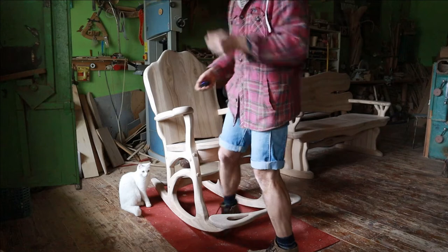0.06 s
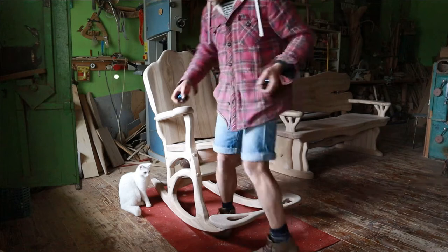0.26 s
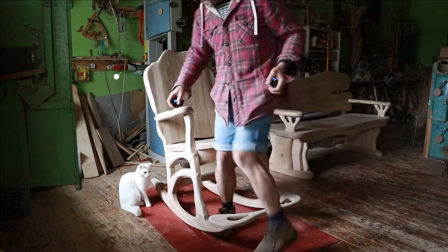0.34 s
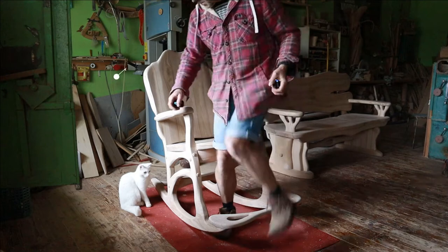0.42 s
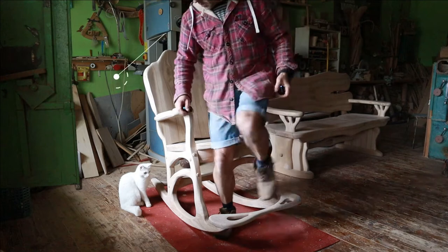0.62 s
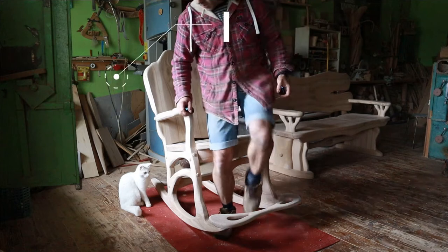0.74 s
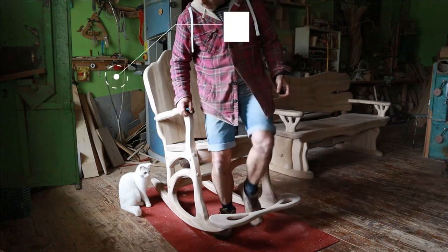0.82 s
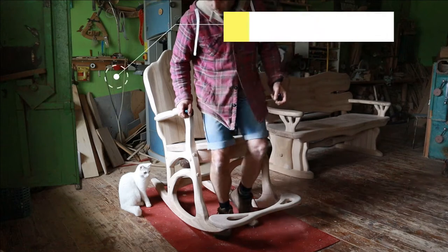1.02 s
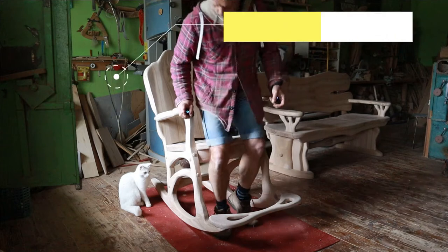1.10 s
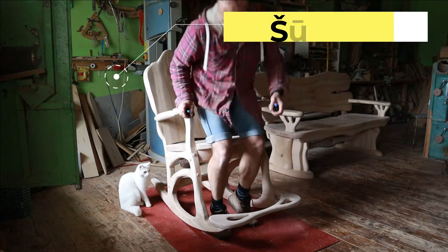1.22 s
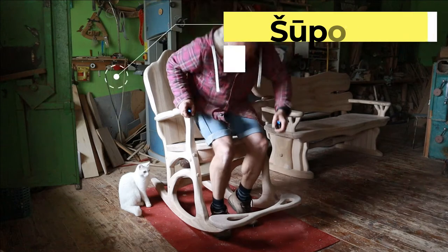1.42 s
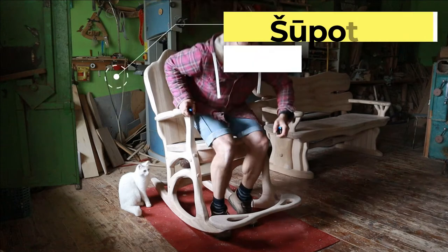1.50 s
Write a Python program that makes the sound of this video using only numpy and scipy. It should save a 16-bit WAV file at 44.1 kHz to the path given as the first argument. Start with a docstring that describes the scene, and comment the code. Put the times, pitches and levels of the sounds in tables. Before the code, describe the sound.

Dull steps on a wooden floor, with scuffing soles and a rocking chair's dry ticks.

```python
"""Someone steps about on a rug over floorboards in a workshop and lowers onto a wooden rocking chair.
First, heels set the boards ringing in a quick run of thumps, while soles scuff and wood ticks.
Near the middle come a few sharp ticks and more rubbing of soles and clothes. After one second,
softer thumps and lower ticks follow, and a last scuff trails off.
All the way through, the room hisses softly with one faint whine."""
import sys
import numpy as np
from scipy import signal
from scipy.fft import rfft, irfft
from scipy.io import wavfile
from scipy.ndimage import uniform_filter1d

SR = 44100
rng = np.random.default_rng(int(sys.argv[2]) if len(sys.argv) > 2 else 0)


def store_pcm(level_fs):
    """Save levels as 16-bit WAV."""
    pcm = np.round(np.clip(level_fs, -1, 1) * 32767).astype(np.int16)
    wavfile.write(sys.argv[1], SR, np.atleast_2d(pcm).T)


N = 68355


def floor_thumps():
    """A heel or chair runner rings the board notes near its pitch, until weight chokes the ring."""
    # Blows on the boards: (time [s], level [dB], pitch struck most [Hz], time until choked [s])
    blows = [(.151, -46, 72, .03), (0.2204, -25.5, 225.4, 0.016), (0.2256, -26, 70, 0.033),
             (.26, -24.5, 114, 0.011), (0.282, -24.5, 167, 0.0081), (0.288, -21.5, 77, 0.025),
             (0.2925, -29, 241, 0.0388), (.2944, -28.5, 164, 0.013), (0.3154, -29.5, 138, 0.0067),
             (0.3227, -21.5, 137, 0.00755), (.338, -35.5, 196, 0.0247), (0.3486, -26, 106, 0.0167),
             (0.3746, -24.5, 129.4, .016), (0.4015, -29, 47.6, 0.035), (0.4052, -29.5, 124.3, 0.0105),
             (.432, -38, 129, 0.035), (0.4869, -33.5, 114.6, .011), (.487, -39, 56, .035),
             (.526, -40, 55, .065), (.67, -44.5, 56, .037), (.916, -50, 66, .036), (1.062, -45, 105, .015),
             (1.09, -38, 76, .032), (1.128, -44, 95, .016), (1.262, -42, 68, 0.033),
             (1.306, -43, 78, 0.036)]
    # The boards' own notes: (pitch [Hz], level [dB], time to fade by 60 dB [s])
    board_notes = [(55.0, -1.2, 0.274), (72.0, 0.7, 0.275), (96.0, -2.5, 0.6), (150.0, 2.1, 0.367),
                   (188.0, -2.5, 0.6), (235.0, -4.9, 0.6), (278.0, 0.0, 0.118), (376.0, 9.8, 0.379)]
    choke_s, build_share = .003, .25
    out, t = np.zeros(N), np.arange(SR // 3) / SR
    for start, level_db, struck_hz, held_s in blows:
        ring = sum(bell_curve(hz, struck_hz, octaves=.27) * amp(db - 60 * t / fade_s)
                   * np.sin(2 * np.pi * hz * t) for hz, db, fade_s in board_notes)
        build = 1 - np.exp(-t / (build_share * held_s))
        choke = np.exp(-np.maximum(t - held_s, 0) / choke_s)
        add(out, start, amp(level_db) * ring * build * choke)
    return out


def scuffs():
    """Dragging soles and cloth make many tiny clicks that blur into a rub. Gives mid and side."""
    # Drags: (start [s], length [s], level [dB], centre pitch [Hz], width [octaves])
    drags = [(0.218, 0.027, -58.5, 3950, 0.27), (.222, 0.07, -52.5, 340, 0.31),
             (0.211, 0.1, -55.5, 900, 0.82), (0.273, 0.27, -52, 420, 1.16),
             (0.279, 0.16, -54.5, 1120, 1.48), (0.34, 0.3, -58.5, 1340, 1.18),
             (0.382, 0.084, -60, 5240, 0.88), (0.469, 0.59, -66.5, 7000, 0.82),
             (0.642, 0.29, -62.5, 4630, 0.38), (0.747, 0.12, -55.5, 1540, 1.06),
             (0.772, 0.41, -55.5, 2170, 0.72), (0.866, .07, -65, 2650, 0.15),
             (0.911, 0.069, -59, 1710, 0.12), (0.649, 0.17, -58, 1880, 0.97),
             (0.796, 0.3, -64.5, 6560, 0.62), (1.03, 0.58, -57.5, 130, .6), (1.06, 0.15, -54.5, 546, 1.84),
             (1.08, 0.34, -68.5, 8450, 0.4), (1.169, 0.22, -51, 695, 0.85), (1.19, 0.16, -56.5, 190, 0.67),
             (1.157, 0.25, -56.5, 2270, 0.95), (1.418, 0.47, -60.5, 2480, 0.76)]
    grit_per_s, grit_spread_db = 5500, 2
    skew = np.log(.5) / np.log(.3)  # a stroke is loudest 30% of the way through
    out, t = np.zeros((2, N)), np.arange(SR // 2) / SR
    for start, length, level_db, hz, octaves in drags:
        size, chance, sign = rng.random((3, len(t)))
        strength = amp(-grit_spread_db * np.log(size + .00085))
        grit = strength * (chance < grit_per_s / SR) * np.sign(sign - .5)
        rub = evened(keep_band(grit, hz, octaves))
        stroke = np.sin(np.pi * np.clip(t / length, 0, 1) ** skew) ** 2
        # The same rub, backwards and with less bass, makes the sound wide.
        side = amp(1) * signal.lfilter(*signal.butter(1, 900, "high", fs=SR), rub[::-1])
        add(out, start, amp(level_db) * stroke * np.array([rub, side]))
    return out


def wood_ticks():
    """Wood gives dry snaps: each is one sharp click and a crackle that dies away."""
    # Snaps: (time [s], peak level [dB], centre pitch [Hz], width [octaves], time to fade by 60 dB [s])
    snaps = [(0.2276, -48, 4200, 0.29, 0.012), (0.2935, -36.5, 2100, 0.4, 0.014),
             (0.338, -42, 1100, 0.4, 0.017), (.381, -37, 1300, 0.94, 0.033), (.4146, -28.5, 1900, .8, .014),
             (.7512, -31.5, 2300, .55, .012), (.7532, -37, 2800, .5, .012),
             (0.7825, -37, 1150, 0.55, 0.011), (0.798, -42, 1150, 0.24, 0.0074),
             (1.226, -47, 517, 0.39, 0.027), (1.2, -47.5, 600, 0.17, 0.028), (1.258, -42, 500, 0.2, 0.035),
             (1.304, -48, 600, 0.23, 0.041)]
    lead = 100  # samples of space ahead of the click, as the filter smears it both ways
    out, t = np.zeros(N), np.arange(2048) / SR
    click = 1. * (t == 0)
    for start, peak_db, hz, octaves, fade_s in snaps:
        crackle = .1 * rng.standard_normal(len(t))
        burst = (click + crackle) * amp(-60 * t / fade_s)
        snap = keep_band(np.roll(burst, lead), hz, octaves)
        add(out, start - lead / SR, amp(peak_db) * snap / abs(snap).max())
    return out


def room_echo(sound):
    """The room sends back many dull echoes that die away. Gives mid and a side with no bass."""
    fade_s, dull_hz, gap = .35, 5000, 20  # one echo falls at random in every gap of 20 samples
    slots = np.arange(300, SR // 2, gap)
    echoes = np.zeros((2, SR // 2 + gap))
    arrivals = slots + rng.integers(0, gap, (2, len(slots)))
    np.put_along_axis(echoes, arrivals, rng.choice([-1., 1.], arrivals.shape), 1)
    echoes *= amp(-60 * np.arange(echoes.shape[1]) / SR / fade_s)
    echoes = signal.lfilter(*signal.butter(1, dull_hz, fs=SR), echoes)
    mid, side = signal.fftconvolve(sound[None], echoes / np.linalg.norm(echoes[0]), axes=1)[:, :N]
    side = signal.lfilter(*signal.butter(2, 300, "high", fs=SR), side)
    return amp(-7) * np.array([mid, amp(-4) * side])


def room_hiss():
    """The room's soft hiss, in two separate layers. Gives mid and side."""
    # Hiss that is alike left and right: (pitch [Hz], relative level [dB])
    mid_tone = [(15, -87), (25, 11.5), (255, 4), (805, 0), (921, -2), (1110, -3.5), (1840, -5.5),
                (3690, -11), (11600, -24), (14800, -43)]
    # Hiss that is opposite left and right: (pitch [Hz], relative level [dB])
    side_tone = [(15, -51), (25, -40), (43, -44), (128, -8), (316, -8), (361, -13), (402, -7.5),
                 (3600, -20.5), (11000, -33), (14800, -45)]
    side = flickering_noise(side_tone, level_db=-51)
    return flickering_noise(mid_tone, level_db=-53), side


def flickering_noise(tone, level_db):
    """Steady noise in which patches of pitch drift in level and the whole sound flickers a little."""
    patch_db, flicker_db, frames = 1.2, .5, N // 128 + 5
    real, imaginary, patches = rng.standard_normal((frames, 257, 3)).T
    patches = uniform_filter1d(patches, size=6, axis=0)  # smooth across pitch
    patches = evened(uniform_filter1d(patches, size=20, axis=1))  # then across time
    flicker = evened(uniform_filter1d(rng.standard_normal(frames), size=8))
    spectrum = (real + 1j * imaginary) * amp(patch_db * patches + flicker_db * flicker)
    noise = signal.istft(spectrum, nperseg=512, noverlap=384)[1][:N]
    hz, db = np.transpose(tone)
    colour = amp(np.interp(np.log(np.fft.rfftfreq(N, 1 / SR) + 1), np.log(hz), db))
    return amp(level_db) * evened(irfft(rfft(noise) * colour, N))


def faint_whine(hz=3652, level_db=-71.5):
    """One thin, high tone that never changes."""
    return amp(level_db) * np.sqrt(2) * np.sin(2 * np.pi * hz * np.arange(N) / SR)


def amp(db):
    """Turns decibels into a number to multiply a sound by."""
    return 10 ** (np.asarray(db) / 20)


def evened(x):
    """Scales a signal so that its average strength (rms) is 1."""
    return x / np.sqrt(np.mean(x ** 2) + 1e-20)


def add(mix, start, sound):
    """Mixes a sound in at a start time in seconds."""
    part = mix[..., round(start * SR):][..., :sound.shape[-1]]
    part += sound[..., :part.shape[-1]]


def bell_curve(hz, centre_hz, octaves):
    """A weight that is 1 at the centre pitch and falls away above and below it."""
    return np.exp(-.5 * (np.log2(hz / centre_hz) / octaves) ** 2)


def keep_band(sound, centre_hz, octaves):
    """Keeps the part of a sound that lies near one pitch."""
    hz = np.fft.rfftfreq(len(sound), 1 / SR) + 1
    return irfft(rfft(sound) * bell_curve(hz, centre_hz, octaves), len(sound))


def scene():
    """Mixes mid (alike in both ears) and side (opposite in each ear) into left and right."""
    thumps, ticks, whine = floor_thumps(), wood_ticks(), faint_whine()
    rubs = scuffs()
    mid, side = rubs + room_echo(amp(-14) * thumps + ticks + rubs[0])
    hiss_mid, hiss_side = room_hiss()
    # Scuffs, echoes and ticks lean to the right, the whine to the left.
    side = side - .097 * mid - amp(-9) * ticks + amp(-8) * whine + hiss_side
    mid = mid + thumps + ticks + whine + hiss_mid
    return np.array([mid + side, mid - side])


def record(dry):
    """Fades in quickly, then cuts the deepest bass, as the microphone does, and the highest treble."""
    start_s, fade_s, low_cut_hz, high_cut_hz = .0075, .003, 37.4, 14900
    fade = np.clip((np.arange(N) / SR - start_s) / fade_s, .04, 1)
    trimmed = signal.lfilter(*signal.butter(3, low_cut_hz, "high", fs=SR), dry * fade)
    treble_cut = signal.firwin(1023, high_cut_hz, window=("kaiser", 9), fs=SR)
    return signal.oaconvolve(trimmed, treble_cut[None], "same")


dry = scene()
out = record(dry)
store_pcm(out)
```